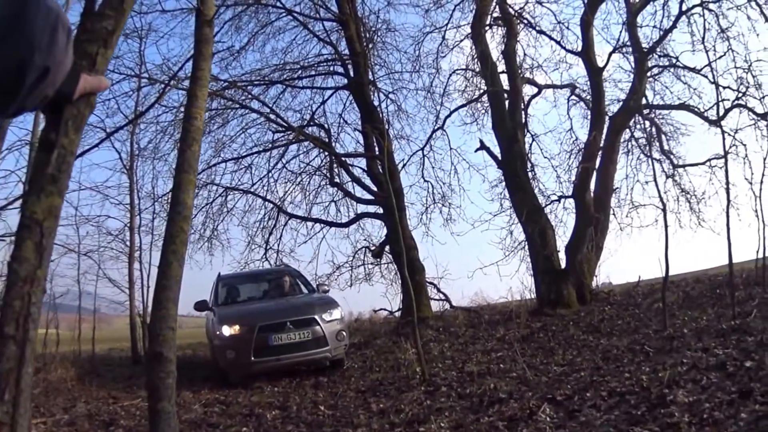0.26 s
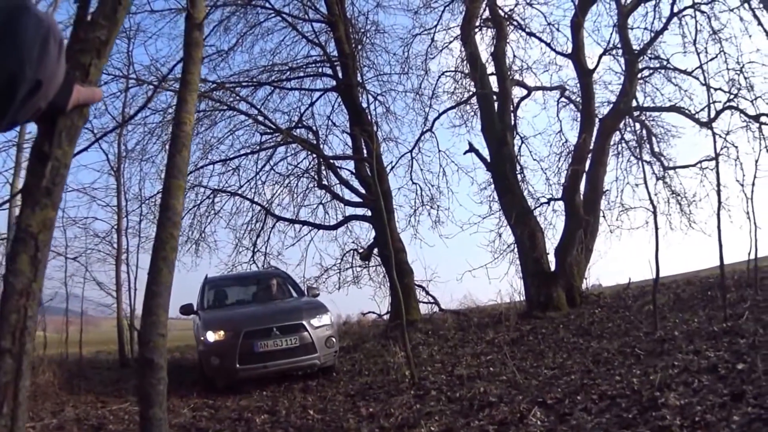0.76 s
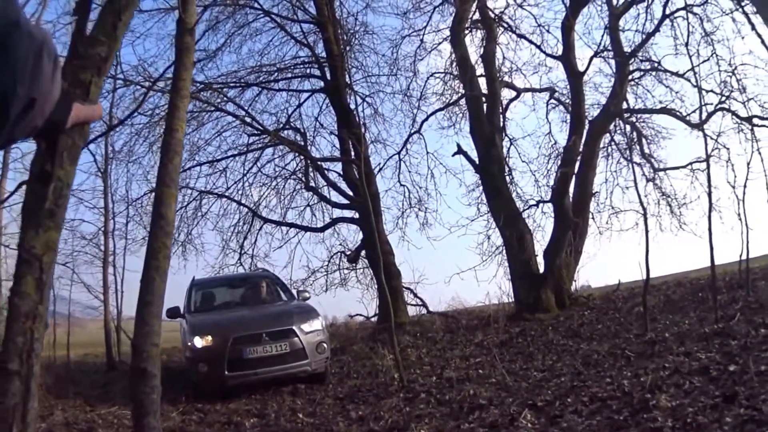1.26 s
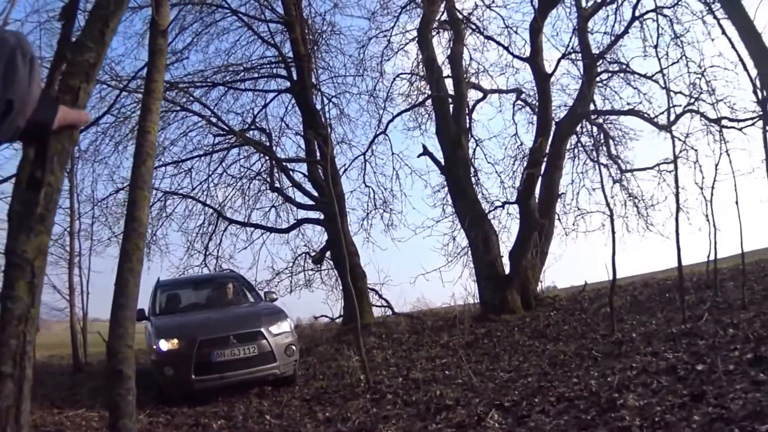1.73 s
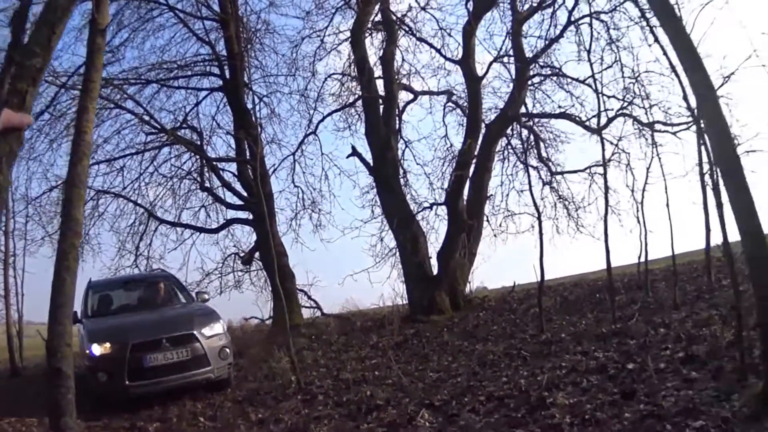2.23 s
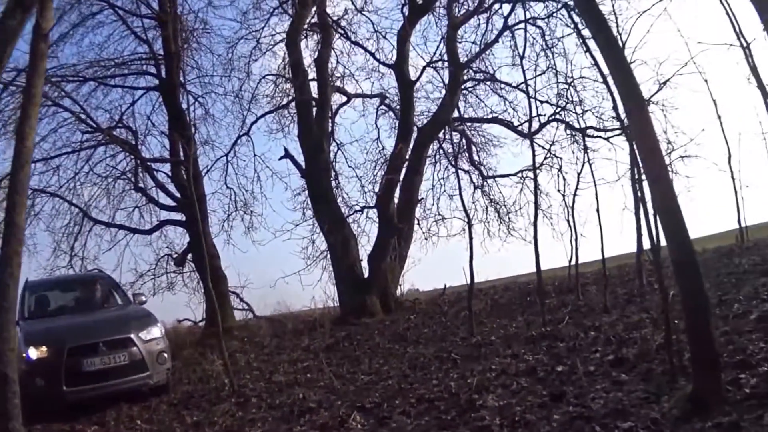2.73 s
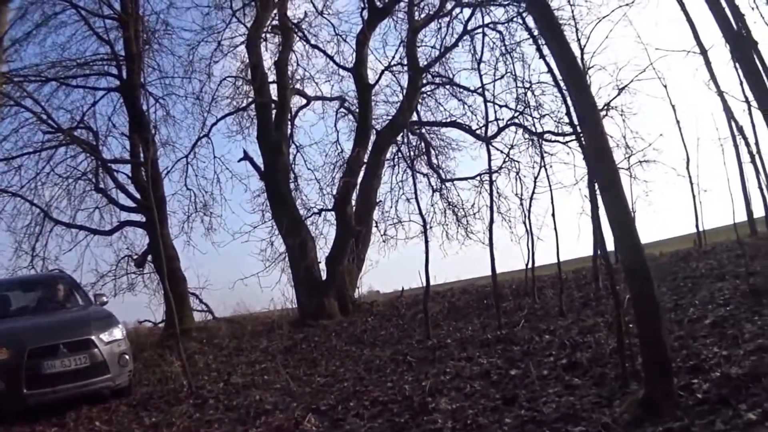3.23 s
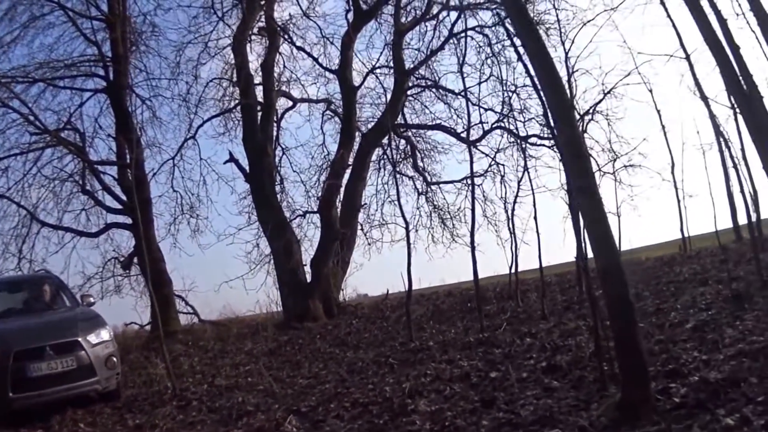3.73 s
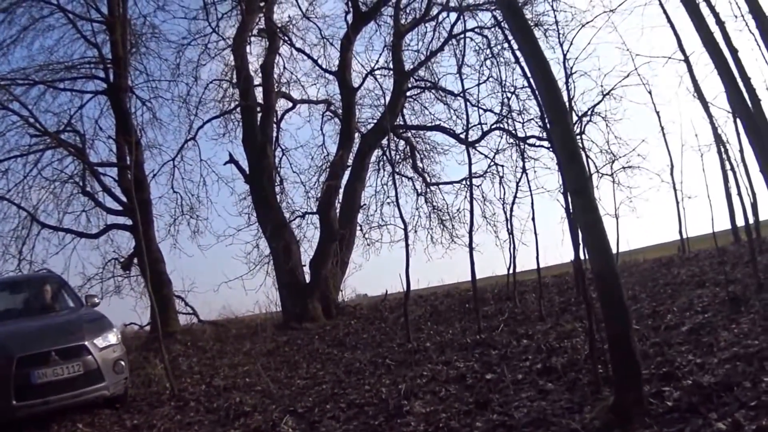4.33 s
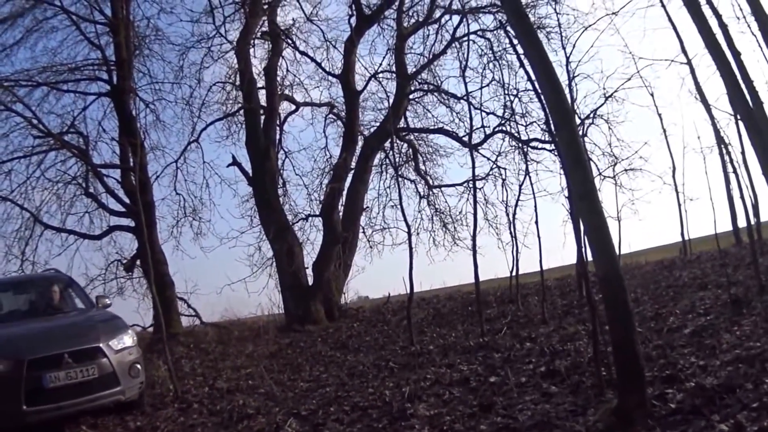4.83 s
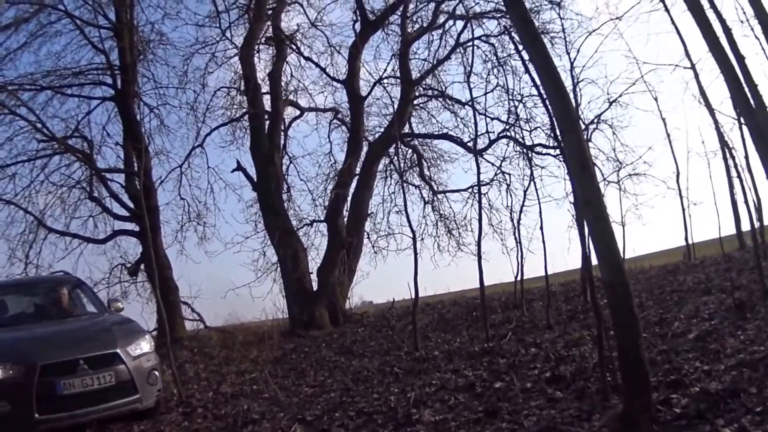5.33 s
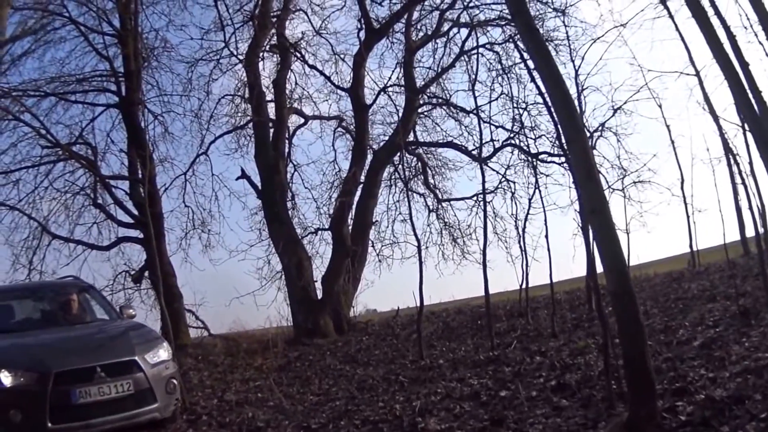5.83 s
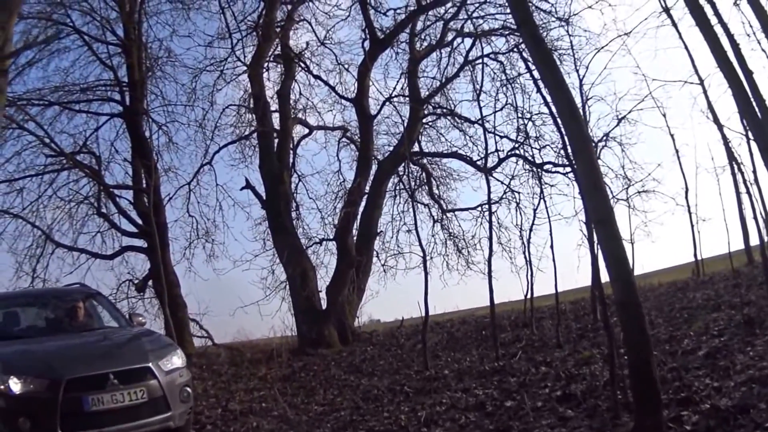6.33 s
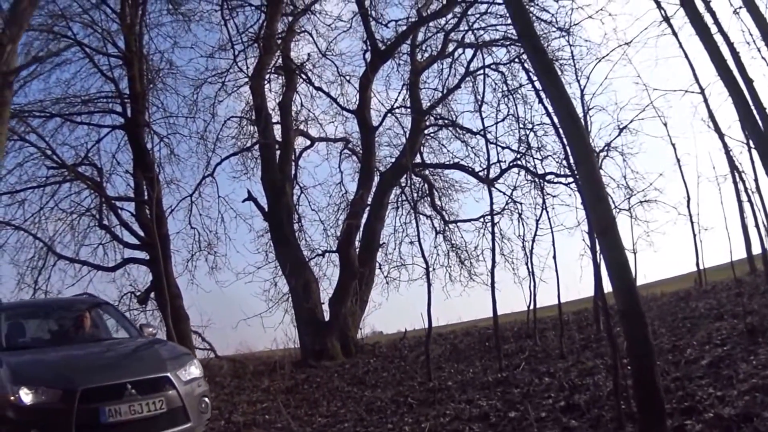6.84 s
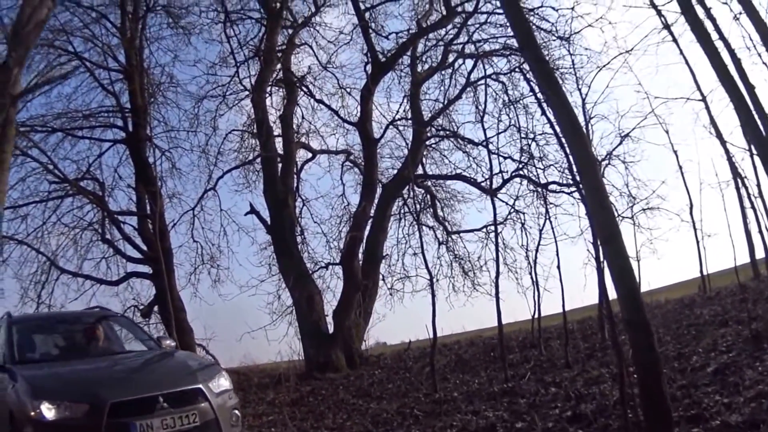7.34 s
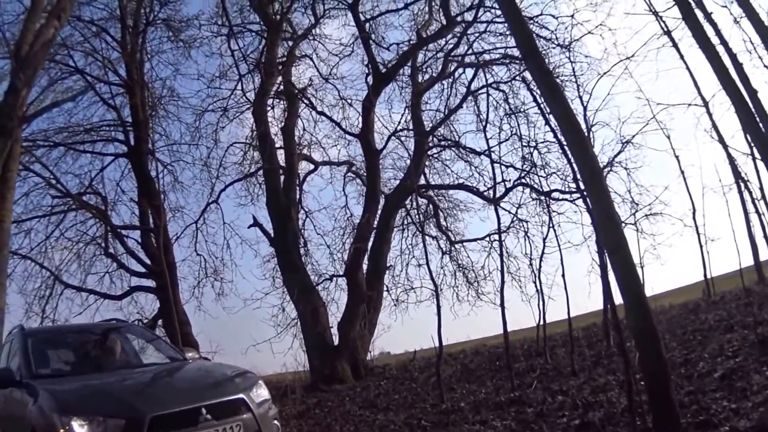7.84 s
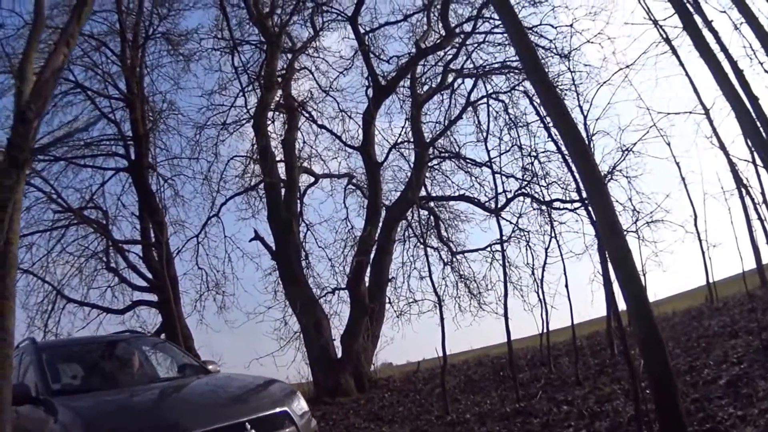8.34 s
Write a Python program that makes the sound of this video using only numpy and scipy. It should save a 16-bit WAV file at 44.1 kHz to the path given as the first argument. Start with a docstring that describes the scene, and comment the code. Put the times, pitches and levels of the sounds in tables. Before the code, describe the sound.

Dry leaves crackle and rustle under the tyres of a slowly approaching diesel car, heard over faint forest air. Early on a twig cracks, the engine slows to a knocking idle, and a hollow thud lands near the microphone among dry knocks. Two gentle pushes of the throttle follow as the car grows louder, with low bumps scattered throughout. Finally the engine idles again and several twigs snap.

```python
"""A diesel SUV creeps up a wooded slope towards the listener, over faint forest air. Every firing knocks
on the engine block, the exhaust drones, and the tyres crush dry leaves and snap twigs. The engine
sinks to a lugging idle as dull bumps and woody knocks begin close by, with one hollow thud at 1.6 s.
It then picks up, surges with pushes of the pedal near 3 s and 6 s, and falls back to idle
in a last flurry of snapping twigs."""
import sys
import numpy as np
from scipy import signal
from scipy.fft import rfft, irfft, next_fast_len
from scipy.io import wavfile
from scipy.ndimage import uniform_filter1d, map_coordinates

SR = 44100
rng = np.random.default_rng(int(sys.argv[2]) if len(sys.argv) > 2 else 0)


def bounce(signal):
    """Save signal as a 16-bit WAV file at the path given by the first command-line argument."""
    frames = np.transpose(np.atleast_2d(signal))
    limited = np.clip(frames, -1, 1)
    pcm = np.round(limited * 32767).astype(np.int16)
    wavfile.write(sys.argv[1], SR, pcm)


N = 378378
TIME = np.arange(N) / SR
SIZE = next_fast_len(N + SR // 2, True)
HZ = np.maximum(np.arange(SIZE // 2 + 1) * SR / SIZE, 1)

# The car's approach. Each row: time in seconds, distance in metres.
CAR_DISTANCE = [(0, 10.05), (1.8, 9.6), (3.5, 7.2), (5.5, 6.82), (7, 6.13), (8.58, 5.68)]
# Stereo image of the car. Each row: frequency in Hz, likeness of the two ears from 0 to 1.
EAR_LIKENESS = [(60, .97), (200, .88), (430, .55), (680, .05), (950, .05), (1250, .82), (1800, .96),
                (3200, .88), (5200, .85), (7500, .78), (11000, .78)]
# Engine speed. Each row: time in seconds, firings per second.
FIRING_RATE = [(0, 31.2), (.9, 25.2), (1.6, 24.8), (1.9, 34.8), (2.8, 32.6), (3.02, 40.6), (3.2, 41.6),
               (3.6, 36.9), (4.1, 33.5), (4.45, 36), (5.1, 32.9), (5.88, 30.6), (6.05, 37.2), (6.28, 40),
               (6.7, 34.2), (7.25, 31.2), (7.7, 23.8), (8.1, 26.3), (8.58, 25.5)]
# Pushes of the pedal. Each row: start in seconds, strength in dB.
PEDAL_PUSHES = [(2.86, 3), (3.2, 2.5), (5.9, 4), (6.55, 1.5)]
# Resonances of the bonnet. Each row: frequency in Hz, width in Hz, relative level in dB.
BONNET_MODES = [(247, 19, -12.5), (466, 35, -1), (535, 450, -12.5), (643, 58, -8), (1260, 57, -5)]
# Ring of the block and its covers. Each row: frequency in Hz, width in Hz, relative level in dB.
BLOCK_MODES = [(310, 130, -16.5), (1257, 170, -11), (1699, 273, -6.5), (1839, 77, 2.5), (2056, 155, -0.5),
               (2273, 220, 1.5), (2470, 230, -5.5), (2730, 96, -6.5), (3010, 420, -10), (3665, 197, -10.5),
               (4080, 220, -11), (4960, 2000, -15), (6340, 720, -15.5)]
# Response of the exhaust pipe. Each row: frequency in Hz, gain in dB.
PIPE_RESPONSE = [(24, -35), (32, -10), (41, -2.5), (53, 0), (66, -12.5), (80, -3), (100, -8), (120, -7),
                 (142, -11), (168, -6), (205, -12), (240, -5), (280, -16), (480, -25.5)]
# Deeper (+) or thinner (-) leaves under a tyre. Each row: middle in seconds, length in seconds,
# change of the crackle in dB, change of the rustle in dB.
LEAF_PATCHES = [(.08, 0.41, 7.5, 6), (0.705, 0.36, 3.5, 5), (1.076, 0.34, 6.5, 6.5), (1.747, .3, -2.5, 1),
                (2.017, 0.17, 3, 2.5), (2.19, 0.11, -1.5, 1), (2.438, 0.22, 1, 1.5), (3.31, 0.18, 6, 7),
                (3.83, 0.12, 0.5, -8), (4.44, 0.21, 2.5, 5), (5.02, 0.31, 4, 3), (5.41, .12, 3, 3.5),
                (5.653, 0.13, 5, 3.5), (6.118, 0.45, -1.5, -7.5), (7.02, 0.28, 4, -4), (7.373, 0.093, 8, 3),
                (7.527, 0.082, 4, 3.5), (7.63, .12, -0.5, -3.5), (8.06, 0.33, 8, 6.5)]
# Swell of the rolling rumble. Each row: time in seconds, level in dB.
RUMBLE_LEVEL = [(0, -64), (1.2, -53.5), (2.7, -60.5), (4.7, -63.5), (7.1, -66), (7.9, -57), (8.58, -70)]
# Tone colours of the noises and hits. Each row: frequency in Hz, relative level in dB.
CRACKLE_SPECTRUM = [(1500, -31), (4000, -5.5), (6200, -2.5), (8300, -1.5), (11500, -1)]
RUSTLE_SPECTRUM = [(900, -28), (1500, -8), (2400, 1.5), (3400, -3), (3900, -2.5), (4650, -2.5), (5300, 0),
                   (6100, -4), (7000, -2.5), (9000, -31.5)]
RUMBLE_SPECTRUM = [(15, -26), (35, 10), (80, 2), (160, 1), (330, -2.5), (550, -6), (900, -7), (2000, -3.5),
                   (8000, -97)]
AIR_SPECTRUM = [(20, -9), (100, -10), (350, -9), (600, 7.5), (1000, 1.5), (4000, -5), (11000, -47)]
TWIG_SPECTRUM = [(500, -12), (1300, -28), (1900, 12), (3000, -2.5), (3800, -0.5), (4600, 11), (5800, -1),
                 (7400, 8), (10300, 3.5), (13000, -5)]
BUMP_SPECTRUM = [(20, -66), (50, -3.5), (100, 3), (190, -3), (300, -7.5), (500, -26.5), (1200, -28)]
WOOD_SPECTRUM = [(100, -5), (350, -0.5), (850, -1.5), (1300, 6), (1900, 12), (2700, -3), (4200, -11),
                 (9000, -11)]
# Cues for the hits. Each row: start in seconds, relative peak in dB, brightness in dB per octave.
TWIG_SNAPS = [(.2688, -26, 1), (.5432, -27, -1), (.618, -8, 0), (.6847, -24, 8), (.791, -25, -7),
              (.8205, -27.5, -2), (1.004, -23, -5.5), (1.5375, -27.5, -3), (4.965, -23, 0),
              (5.3697, -22, 2), (7.4715, -22, 3), (7.7225, -20.5, 6), (7.7696, -22, -5), (7.7955, -21, -5),
              (8.1349, -12, 4.5), (8.1866, -16, 5)]
STRONG_BUMPS = [(.727, -37, 0), (1.09, -43.5, -0.5), (1.19, -38.5, 0.5), (1.265, -43, 5),
                (1.43, -41.5, -.5), (1.506, -38.5, 0.5), (1.968, -43, -0.5), (2.012, -40, 1),
                (2.122, -40.5, 0.5), (2.268, -37, 0.5), (2.755, -43, 0), (3.775, -32, 1), (3.997, -37, 0),
                (4.085, -34, 0), (4.105, -40, 0), (4.197, -36.5, 0), (4.786, -44, -0.5), (4.83, -43, -0.5),
                (5.175, -41, -0.5), (6.492, -39.5, 0), (6.52, -36, -0.5), (6.582, -44, -1),
                (6.917, -38, -0.5), (7.69, -45, 0), (7.815, -35.5, 0), (8.185, -37, 0.5)]
WOOD_KNOCKS = [(.765, -41.5, -10), (1.004, -30.5, -0.5), (1.208, -34.5, -0.5), (1.538, -24, 3),
               (1.624, -26, 1), (3.909, -31, -3.5), (7.874, -29.5, -1)]
# Cue for the hollow thud. Its one row: start in seconds, peak in dB.
THUD_CUE = [(1.571, -26)]
# Ring of the hollow body. Each row: frequency in Hz, relative level in dB, seconds to fade by 60 dB.
HOLLOW_MODES = [(207.5, -22, 1), (308, -12, 0.17), (340, 3.5, 0.055), (412, -19, 0.58), (535, -16, 0.19),
                (648, -11.5, 0.14), (694, -15, .14), (248, 2, 0.041), (453, 8.5, 0.022)]
# Peaks and notches of the two microphone ports. Each row: frequency in Hz, width in Hz,
# left gain in dB, right gain in dB.
PORT_EQ = [(2380, 300, 1, -3), (2900, 500, 1, -1), (3750, 350, -3, 1), (4150, 300, 2, 0),
           (4550, 300, 0, -4), (5200, 500, 0, 2), (5520, 350, -7, 0), (6050, 350, 3, 2),
           (6480, 350, -10, -2), (7200, 600, 5, 0), (7750, 400, -1, -5), (8050, 300, -7, 0),
           (8600, 650, 3, -.5), (9700, 500, -6, -1.5), (10500, 900, 5, 5.5)]
# Phase between the sides. Each row: frequency in Hz, lead of the left in radians.
LEFT_LEAD = [(100, -0.53), (500, -0.33), (800, -1.9), (1300, -0.12), (5000, 0.59), (6300, 0.76),
             (7000, 1.35), (11000, 1.28)]

REFERENCE_M, CRUISE_RATE = 8, 30   # levels are set at this distance and these firings per second
LUG_BELOW_RATE, LUG_RANGE = 29, 6   # firings per second: lugging starts, and is full this much lower


def from_db(db):
    """Decibels to gain."""
    return 10 ** (np.asarray(db) / 20)


def rms_one(x):
    """Scale to unit power."""
    return x / np.sqrt(np.mean(x ** 2) + 1e-20)


def in_time(points):
    """An automation curve, with straight lines between its points."""
    return np.interp(TIME, *np.transpose(points))


def over_hz(points, at_hz=HZ):
    """A curve with straight lines over log frequency."""
    hz, value = np.transpose(points)
    return np.interp(np.log(at_hz), np.log(hz), value)


def drift(rate_hz):
    """A random wobble of unit power, mostly slower than rate_hz."""
    knots = rng.standard_normal(4096)
    return rms_one(map_coordinates(knots, [TIME * rate_hz * 2], order=1, mode="wrap"))


def causal(gain):
    """Minimum-phase response of a gain curve: nothing sounds before its cause."""
    cepstrum = irfft(np.log(gain + 1e-9), SIZE)
    cepstrum[1:SIZE // 2] *= 2
    cepstrum[SIZE // 2 + 1:] = 0
    return np.exp(rfft(cepstrum))


def resonances(modes):
    """Gain of steep-sided resonances, with dark valleys between them."""
    power = sum(from_db(db) ** 2 / (1 + ((HZ - hz) / (.67 * width)) ** 2) ** 2 for hz, width, db in modes)
    return np.sqrt(power)


def from_car(pair, gain):
    """Colour a direct and a scattered signal and spread them over two ears; unit power in the middle."""
    direct, scattered = rfft(pair, SIZE) * causal(gain)
    alike = np.clip(over_hz(EAR_LIKENESS), 0, .995)
    mid = np.sqrt(1 + alike) * direct
    side = np.sqrt(1 - alike) * scattered
    ears = irfft([mid + side, mid - side], SIZE)[:, :N]
    return ears / np.std(ears.mean(axis=0))


def nearness():
    """Gain in dB as the distance shrinks."""
    return 20 * np.log10(REFERENCE_M / in_time(CAR_DISTANCE))


def pedal(attack_s=.099, release_s=.7):
    """Load on the engine in dB: each push comes on quickly and eases off slowly."""
    load_db = 0
    for start, db in PEDAL_PUSHES:
        age = np.maximum(TIME - start, 0)
        load_db += db * np.minimum(age / attack_s, 1) * np.exp(-age / release_s)
    return load_db


def bonnet_hum():
    """The bonnet hums at its own resonances, whatever the engine speed."""
    return from_car(rng.standard_normal((2, N)), resonances(BONNET_MODES))


def clatter(firings, rate, depth_db, rise_s=.003, decay_s=.008, steady=.25, uneven_db=1.5):
    """Each firing knocks the block, the valves tick a little later, gears and belts fill the rest."""
    def bursts(count):
        age = count % 1 / rate
        strength = from_db(uneven_db * rng.standard_normal(1024))[count.astype(int)]
        return strength * (1 - np.exp(-age / rise_s)) * np.exp(-age / decay_s)
    knocks = bursts(firings)
    valves = .45 * bursts(firings + 1 - .38)   # 0.38 of a firing interval late
    power = steady ** 2 + from_db(depth_db) ** 2 * (knocks ** 2 + valves ** 2)
    force = np.sqrt(power / uniform_filter1d(power, size=SR // 5))   # depth adds punch, not level
    return from_car(force * rng.standard_normal((2, N)), resonances(BLOCK_MODES))


def through_grille(block, near_db):
    """The bright band of the clatter gains as the grille nears."""
    bright = signal.lfilter(*signal.iirpeak(2280, Q=6, fs=SR), block)
    return block + (from_db(.56 * near_db) - 1) * bright


def exhaust_drone(firings, rate, harmonics=15, waver_db=2.5):
    """Harmonics of the firing rate swell as they slide through the resonances of the pipe."""
    drone = 0
    for order in range(1, harmonics + 1):
        level_db = over_hz(PIPE_RESPONSE, order * rate) + waver_db * drift(2.7)
        drone += from_db(level_db) * np.sin(2 * np.pi * (order * firings + rng.random()))
    return drone


def engine():
    """A four-cylinder diesel: the pedal lifts every layer, and lugging makes single knocks stand out."""
    rate = in_time(FIRING_RATE)
    firings = .72 + np.cumsum(rate) / SR
    near_db, load_db = nearness(), pedal()
    lug = np.clip((LUG_BELOW_RATE - rate) / LUG_RANGE, 0, 1)
    hum = from_db(-66 + 3.6 * near_db + .33 * load_db) * bonnet_hum()
    block = clatter(firings, rate, depth_db=-2 + 9.5 * lug)
    block_db = -41 + near_db + load_db + 1.5 * np.log2(rate / CRUISE_RATE)
    drone = from_db(-61 + 1.45 * load_db + 3 * lug) * exhaust_drone(firings, rate)
    return hum + from_db(block_db) * through_grille(block, near_db) + drone


def crushed(spectrum, clicks_per_s, size_db, clump_db, hiss):
    """Leaves break in clumps of tiny clicks of very uneven size, over a blur of smaller ones."""
    breaks = rng.random((2, N)) < clicks_per_s / SR
    sizes = from_db(size_db * np.minimum(rng.exponential(1, (2, N)), 5))
    clicks = breaks * sizes * rng.choice([-1, 1], (2, N))
    grains = rms_one(clicks) + hiss * rng.standard_normal((2, N))
    return from_car(grains * from_db(clump_db * drift(35)), from_db(over_hz(spectrum)))


def leaf_litter():
    """Leaves crackle and rustle under the tyres, growing as they near and changing with each patch."""
    patches_db = sum(np.outer(changes_db, .5 ** ((2 * (TIME - middle) / length) ** 2))
                     for middle, length, *changes_db in LEAF_PATCHES)
    crackle_db, rustle_db = patches_db + 1.46 * nearness()
    crackle = crushed(CRACKLE_SPECTRUM, clicks_per_s=2500, size_db=5.5, clump_db=.85, hiss=1)
    rustle = crushed(RUSTLE_SPECTRUM, clicks_per_s=3500, size_db=3.5, clump_db=2, hiss=.45)
    return from_db(-45.5 + crackle_db) * crackle + from_db(-48 + rustle_db) * rustle


def rolling_rumble(waver_db=1.8):
    """The rolling car makes a low, unsteady rumble."""
    level_db = in_time(RUMBLE_LEVEL) + waver_db * drift(9)
    return from_db(level_db) * from_car(rng.standard_normal((2, N)), from_db(over_hz(RUMBLE_SPECTRUM)))


def forest_air(level_db=-65):
    """A faint, wide bed of steady forest air."""
    noise = rfft(rng.standard_normal((2, N)), SIZE)
    air = irfft(noise * causal(from_db(over_hz(AIR_SPECTRUM))), SIZE)[:, :N]
    return from_db(level_db) * rms_one(air)


def blows(cues, spectrum, t60, rough, tail_db, tail_t60, tilt_above_hz=800):
    """Each blow is a push, a short rough burst and a faint tail from the trees; t60s are in seconds."""
    t = np.arange(SR // 4) / SR
    def short_filter(db):
        impulse = irfft(causal(from_db(db)), SIZE)[:len(t)]
        return rfft(impulse, SR)
    body = short_filter(over_hz(spectrum))
    octaves_above = np.log2(np.maximum(HZ / tilt_above_hz, 1))
    brighter = np.log(short_filter(octaves_above))   # a tilt of 1 dB per octave
    track = np.zeros((2, N + SR))
    for start, peak_db, tilt in cues:
        noise = rng.standard_normal((3, len(t)))
        burst = rough * noise[2] * from_db(-60 * t / t60)
        tail = noise[:2] * from_db(tail_db - 60 * t / tail_t60)
        force = (t == 0) + burst + tail
        hit = irfft(rfft(force, SR) * body * np.exp(tilt * brighter), SR)[:, :len(t)]
        first = int(start * SR)
        track[:, first:first + len(t)] += from_db(peak_db) * hit / np.abs(hit).max()
    return track[:, :N]


def twig_snaps():
    """Twigs break under the tyres with short, bright cracks."""
    return from_db(4) * blows(TWIG_SNAPS, TWIG_SPECTRUM, t60=.0084, rough=.23, tail_db=-25, tail_t60=.051)


def dull_bumps(weak_per_s=2.5):
    """Bassy bumps close by: the strong ones on cue, weaker ones at random."""
    count = int(weak_per_s * N / SR)
    weak = [(rng.uniform(0, N / SR), rng.uniform(-51, -47), 0) for _ in range(count)]
    cues = list(STRONG_BUMPS) + weak
    bumps = blows(cues, BUMP_SPECTRUM, t60=.13, rough=.092, tail_db=-50, tail_t60=.16, tilt_above_hz=60)
    return from_db(7) * bumps


def woody_knocks():
    """Dry, woody knocks close by, each with a faint tail from the trees."""
    knocks = blows(WOOD_KNOCKS, WOOD_SPECTRUM, t60=.0092, rough=.12, tail_db=-31, tail_t60=.18)
    return from_db(11) * knocks


def hollow_thud(band_hz=(190, 720), contact_s=.0016):
    """A hollow body is struck softly and rings low."""
    (start, peak_db), = THUD_CUE
    age = np.maximum(TIME - start, 0)
    ring = sum(from_db(db - 60 * age / t60) * np.sin(2 * np.pi * hz * age)
               for hz, db, t60 in HOLLOW_MODES)
    attack = 1 - np.exp(-age / contact_s)
    bandpass = signal.butter(4, band_hz, "band", fs=SR, output="sos")
    thud = signal.sosfilt(bandpass, attack * ring + 1e-18)
    return from_db(peak_db) * thud / np.abs(thud).max()


def scene():
    """The mix: engine and tyres, the nearby hits, and the forest air."""
    motor = engine()
    tyres = leaf_litter() + twig_snaps() + rolling_rumble()
    pan = from_db([[-.5], [.5]])   # a touch to the right
    return motor + pan * tyres + woody_knocks() + dull_bumps() + hollow_thud() + forest_air()


def record(dry, cutoff_hz=11050):
    """Each port colours its own side, the left one leads in the treble, and the top is cut steeply."""
    port_db = sum(np.outer([left, right], .5 ** ((2 * (HZ - hz) / width) ** 2))
                  for hz, width, left, right in PORT_EQ)
    colour = np.array([causal(from_db(db)) for db in port_db])
    phase = np.exp(.5j * np.outer([1, -1], over_hz(LEFT_LEAD)))
    heard = irfft(rfft(dry, SIZE) * colour * phase, SIZE)[:, :N]
    lowpass = signal.ellip(12, .1, 80, cutoff_hz, fs=SR, output="sos")
    return signal.sosfilt(lowpass, heard)


dry = scene()
out = record(dry)
bounce(out)
```